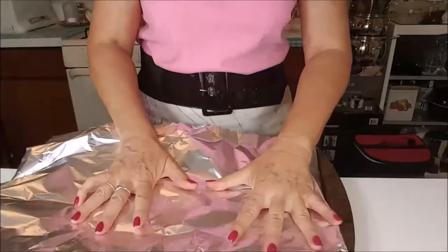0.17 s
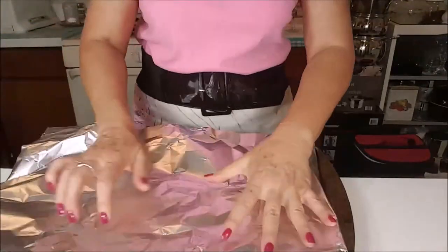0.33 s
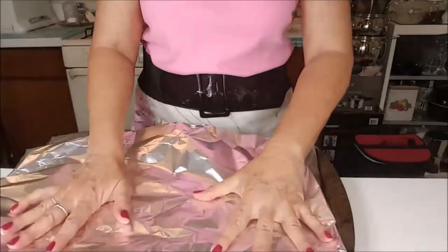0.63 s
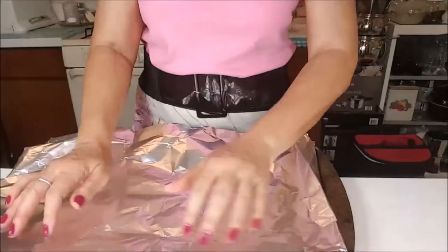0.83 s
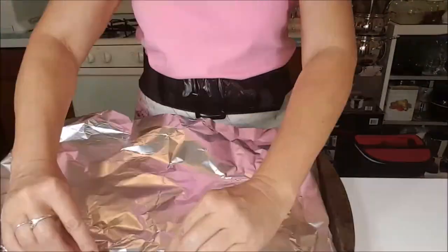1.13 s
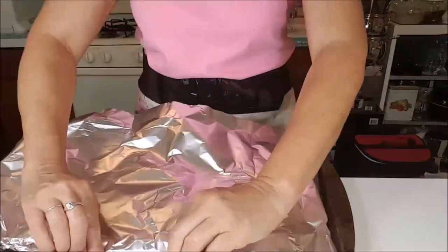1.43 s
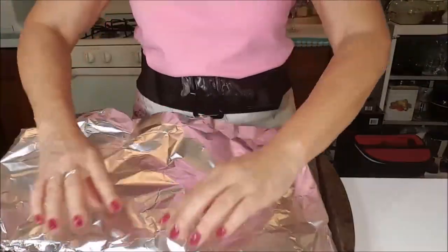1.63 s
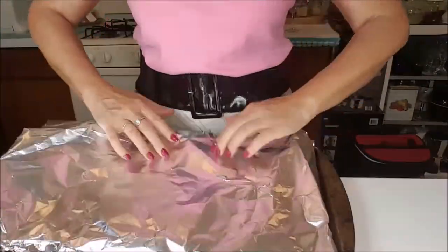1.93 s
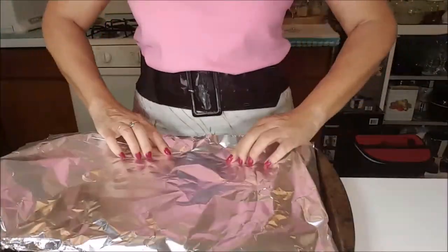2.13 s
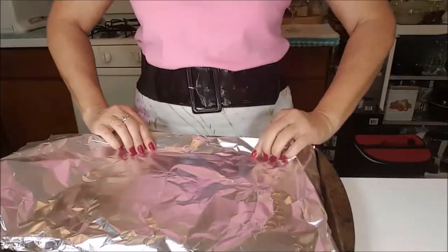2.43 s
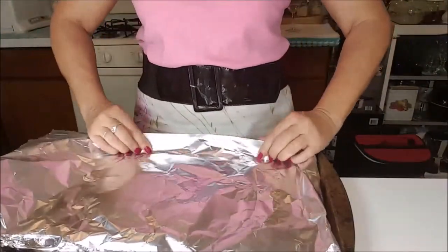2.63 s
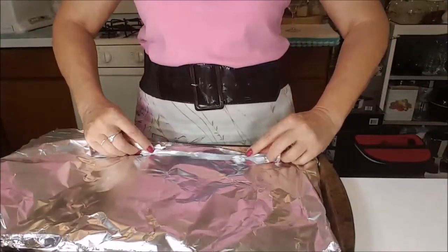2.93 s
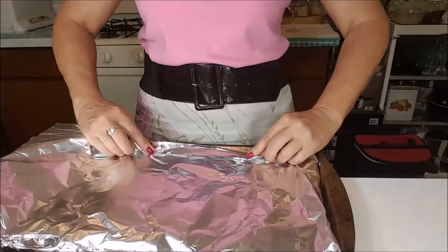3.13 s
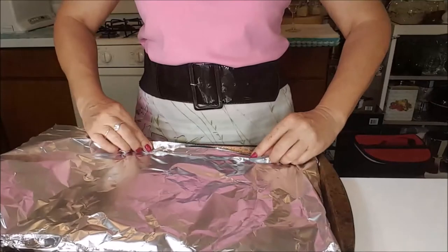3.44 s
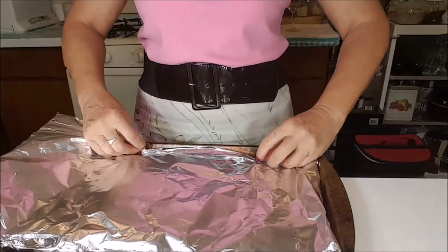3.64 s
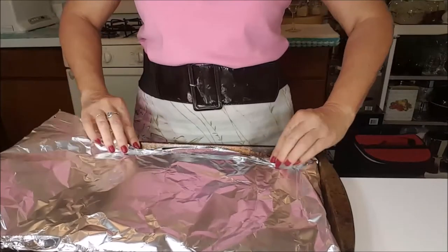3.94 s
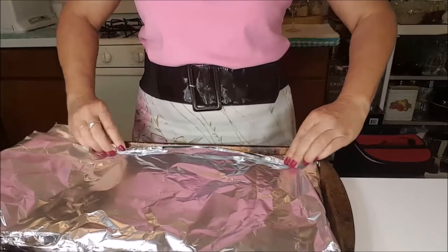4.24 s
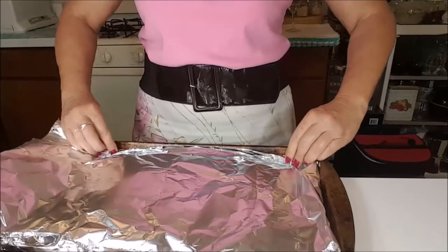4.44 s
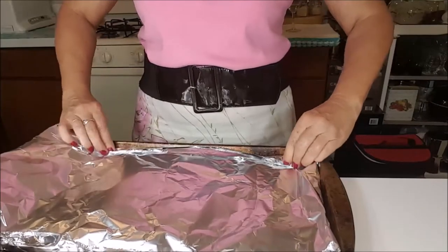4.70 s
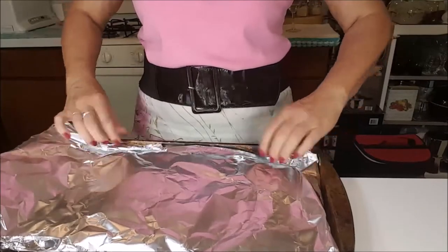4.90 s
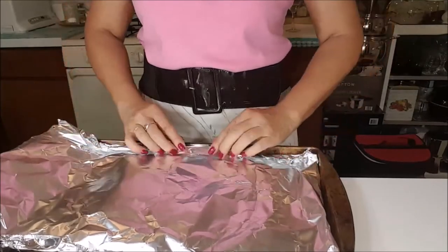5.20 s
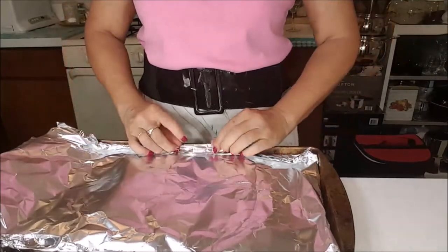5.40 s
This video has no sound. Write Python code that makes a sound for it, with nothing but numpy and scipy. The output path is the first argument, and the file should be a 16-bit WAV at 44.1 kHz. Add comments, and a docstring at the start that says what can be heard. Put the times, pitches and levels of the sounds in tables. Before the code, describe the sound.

Close stereo sound of aluminium foil being smoothed and crimped over a baking sheet in a small kitchen. From 0 to 0.5 s, loud, bright crackling made of countless tiny clicks, with sharp snaps. After a tiny dip, a strong crunch at about 0.6 s carries a ringing metallic knock from the sheet, followed by more rattling to 0.9 s. From 1.1 to 1.75 s the rustle is somewhat softer, with a crisp snap at 1.5 s. A short lull around 1.8-2.0 s exposes the low appliance hum. Vigorous crinkling returns at 2.1-2.7 s over a soft low table rumble, easing toward 3.3 s. From 3.4 to 4.8 s come lighter, irregular pinches and small snaps, with faint low pops near 4.4 s. A duller knock with clatter falls at 4.9 s, then a brief dip and final crisp bursts from 5.15 to 5.5 s. The room echo is short.

```python
"""Aluminium foil crinkles close to a two-channel microphone as two hands smooth and crimp it over a baking sheet.
Creases buckle in little avalanches of ringing noise clicks, denser than the ear can part; big ones snap.
Knocks on the sheet and low pops of a buckling panel are decaying sine modes, with a burst of noise for clatter.
A small kitchen answers with decaying noise, the table rumbles softly (low noise), and an appliance
hums in the room (steady sines over a rush of air)."""
import sys
import numpy as np
from scipy import signal
from scipy.fft import rfft, irfft, next_fast_len
from scipy.io import wavfile
from scipy.ndimage import uniform_filter1d

SR = 44100
rng = np.random.default_rng(int(sys.argv[2]) if len(sys.argv) > 2 else 0)


def master(y):
    """Save y as 16-bit WAV."""
    cut = np.clip(np.atleast_2d(y).T, -1, 1)
    pcm = np.round(cut * 32767)  # scale
    wavfile.write(sys.argv[1], SR, pcm.astype(np.int16))


N = 245328  # length in samples


def amp(db):
    """Decibels to gain."""
    return 10 ** (np.asarray(db) / 20)


def unit(x):
    """Scaled to rms 1."""
    return x / np.sqrt(np.mean(x ** 2) + 1e-20)


def along(points, hz):
    """(Hz, value) points read on a log frequency axis."""
    f, v = np.transpose(points)
    return np.interp(np.log(hz + 1), np.log(f + 1), v)


def over_time(points):
    """Gain at every sample from (seconds, dB) points."""
    return amp(np.interp(np.arange(N) / SR, *np.transpose(points)))


def filtered(x, response):
    """x through a response of frequency, applied to its spectrum."""
    m = next_fast_len(N + SR // 2)
    return irfft(rfft(x, m) * response(np.fft.rfftfreq(m, 1 / SR)), m)[..., :N]


def coloured(x, gain, size=4096):
    """x through the causal minimum-phase filter that has this gain of frequency."""
    cepstrum = irfft(np.log(np.maximum(gain(np.fft.rfftfreq(size, 1 / SR)), 1e-6)))
    # folding the cepstrum forward in time makes the filter causal
    cepstrum[1:size // 2] *= 2
    cepstrum[size // 2 + 1:] = 0
    impulse = irfft(np.exp(rfft(cepstrum)))
    return signal.fftconvolve(x, impulse[None], axes=1)[:, :N]


# Likeness of the two microphone ports. Each row: frequency in Hz, left-right correlation.
PORT_LIKENESS = [(60, 0.2), (200, 0.67), (640, 0.47), (1400, 0.55), (3100, 0.024), (6000, 0.013),
                 (15000, .01)]


def paired(x):
    """Two unrelated channels become alike towards the bass, as at two close microphone ports."""
    def turn(hz):
        return np.arccos(np.clip(along(PORT_LIKENESS, hz), -1, 1)) / 2
    mid, side = filtered(x, lambda hz: np.array([np.cos(turn(hz)), np.sin(turn(hz))]))
    return np.array([mid + side, mid - side])


# Dull flexing of the pressed sheet. Each row: frequency in Hz, relative level in dB per Hz.
FLEX_COLOUR = [(100, -16.5), (185, -6.5), (235, -4), (275, -1), (335, -9.5), (425, 3), (520, -14.5),
               (700, -9.5), (1000, -38.5)]
# Loose foil under flat hands sounds deeper than a tight fold at the rim.
# Each row: time in seconds, gain of the low rattle in dB.
SLACKNESS = [(0, 2), (0.8, 1.5), (1.6, 2.5), (2.1, -3.5), (2.8, 1), (3.6, 0.5), (4.4, 3), (4.9, -1),
             (5.5, -1)]


def foil(deep_hz=1850):
    """Crumpling under the hands, big snaps, and the dull flexing of the pressed sheet."""
    sizzle, rattle, pressure = handling()
    creases = crumple(rate=520, size_db=2.5, even_s=0.034)
    fine, broad = snaps(sizzle, rattle)
    treble = radiated(amp(0.58) * sizzle * creases + fine, True)
    body = radiated(amp(-3.0) * rattle * creases + broad, False)
    deep = filtered(body, lambda hz: 1 / (1 + (hz / deep_hz) ** 6))
    slack = over_time(SLACKNESS)
    flex = coloured(creases * pressure, lambda hz: unit(amp(along(FLEX_COLOUR, hz))))
    return paired(treble + body + (slack - 1) * deep + amp(-4.5) * flex)


# Hands lie on the foil and keep it rustling.
# Each row: start in seconds, end in seconds, effort in dB.
RESTING_HANDS = [(0, 0.458, -30), (0.579, 0.915, -32.5), (1.123, 1.757, -36.5), (1.991, 3.107, -30),
                 (3.09, 3.298, -36.5), (3.391, 4.94, -35), (5.131, 5.54, -35.5)]
# Fingers press or pinch: smoothing outwards, tucking the far edge, rolling the near edge, crimping the rim.
# Each row: start in seconds, hold in seconds, effort in dB, crispness of the spot in dB over the effort,
# weight on the sheet in dB over the effort.
FINGER_PRESSES = [ (0, 0.096, -26.5, 3, -16.5), (0.172, .075, -26.5, 2.5, -16), (0.272, 0.084, -28, 1, -13),
                  (0.613, 0.041, -23, 2, -13.5), (0.677, 0.052, -31, -0.5, -5),
                  (0.753, 0.15, -30.5, 0, -16), (1.14, 0.22, -32, -0.5, -16.5),
                  (1.431, 0.064, -30.5, -3, -9.5), (1.479, 0.081, -30, 0, -12),
                  (1.64, 0.057, -35, 0, -12.5), (1.857, .02, -46, -20, -20), (2.07, 0.072, -25.5, 1.5, -18),
                  (2.218, 0.064, -26.5, -2, -28), (2.347, 0.044, -29.5, -3, -11),
                  (2.391, 0.18, -26.5, -1, -18), (2.61, 0.12, -32, -4, -13.5), (2.794, 0.073, -35, 0.5, -9),
                  (2.924, 0.058, -32, 1.5, -11.5), (3.059, 0.034, -34, 1, -10.5),
                  (3.466, 0.023, -33, -12, -8), (3.545, 0.16, -35.5, 0, -10.5),
                  (3.819, .05, -30.5, 0.5, -16), (3.943, 0.088, -32, 0, -13),
                  (4.141, 0.15, -30.5, 0.5, -12.5), (4.293, 0.032, -29.5, 2, -20),
                  (4.406, 0.031, -34.5, 2.5, -22), (4.563, 0.21, -38, 0, -8), (4.742, 0.057, -32, 0, -14.5),
                  (4.861, 0.074, -30.5, -1, -14.5), (5.161, 0.084, -33.5, 0.5, -33),
                  (5.288, 0.051, -28.5, -1, -16), (5.372, 0.021, -28, 1.5, -20)]
GRIP_WEIGHT_DB = -20  # weight of resting hands on the sheet, over their effort
# sizzle gain at the usual effort, before the foil's mix; dB of sizzle gained per dB of crisp effort
USUAL_EFFORT_DB, SIZZLE_DB, SIZZLE_GROWS = -30, -29.5, 1.07
HISS_DB = -69.5  # faint steady hiss that remains between the hand movements, as an effort


def handling():
    """Gains of sizzle, rattle and pressure: panels rattle with the effort, fine creases sizzle ever more."""
    grips = [(start, end - start, db, 0, GRIP_WEIGHT_DB) for start, end, db in RESTING_HANDS]
    moves = grips + FINGER_PRESSES
    starts, holds, effort_db, crisp_db, weight_db = np.transpose(moves)[:, :, None]
    efforts = amp(effort_db) * push(starts, holds)
    # simultaneous moves add in power
    rattle, crisp, pressure = (np.linalg.norm(efforts * amp(db), axis=0) for db in (0, crisp_db, weight_db))
    crisp_over_hiss = np.hypot(crisp, amp(HISS_DB))
    sizzle = amp(SIZZLE_DB) * (crisp_over_hiss / amp(USUAL_EFFORT_DB)) ** SIZZLE_GROWS
    return sizzle, np.hypot(rattle, amp(HISS_DB)), pressure


# the foil gives way, yields a little less while held, then settles
ATTACK_S, SAG_DB_PER_S, SETTLE_DB_PER_S = 0.0021, 4.5, 208


def push(start, hold):
    """Gain of one push on the foil: a quick rise, a slow sag while it is held, then the foil settles."""
    t = np.maximum(np.arange(N) / SR - start, 0)
    rise = 1 - np.exp(-t / ATTACK_S)
    fall_db = SAG_DB_PER_S * t + SETTLE_DB_PER_S * np.maximum(t - hold, 0)
    return rise * amp(-fall_db)


def crumple(rate, size_db, even_s):
    """A ceaseless run of avalanches of unequal size (rate per second), evened to a steady mean strength."""
    total = int(rate * N / SR)
    starts = rng.uniform(0, N / SR, total)
    sizes = amp(size_db * rng.standard_normal(total))
    x = avalanches(starts, sizes, spread_s=.0025, scatter_db=0.0, ring_s=0.017, edge=3.04)
    # a faint hiss of foil sliding under the fingers fills the gaps
    x = unit(x) + amp(-11) * rng.standard_normal((2, N))
    width = max(int(even_s * SR), 2)
    power = uniform_filter1d(uniform_filter1d(np.mean(x ** 2, 0), width), width)
    return x / np.sqrt(np.abs(power) + 1e-9)


# Big creases giving way close to the microphone.
# Each row: time in seconds, relative sizzle in dB, relative rattle in dB.
BIG_SNAPS = [(.066, -18.5, -38), (.231, -18, -36), (0.348, -20.5, -33), (.444, -19.5, -31),
             (0.548, -33, -36.5), (0.576, -27, -36), (.641, -16, -24), (0.775, -17.5, -21.5),
             (1.105, -37, -40), (1.132, -29, -38), (1.161, -34, -25), (1.205, -30, -27), (1.303, -22, -31),
             (1.339, -21, -28), (1.498, -15, -24), (2.104, -17, -19.5), (2.411, -18, -34),
             (2.634, -21.5, -24), (2.813, -19, -20.5), (3.216, -23.5, -27), (3.329, -33, -39),
             (3.368, -32, -34), (3.388, -28, -32.5), (3.419, -29, -26.5), (3.522, -19, -31),
             (3.789, -20, -27), (4.122, -24, -27), (4.18, -22, -31), (4.332, -20, -33), (4.453, -25, -27.5),
             (4.488, -27, -28), (4.538, -31, -42), (4.626, -21, -27), (4.877, -22, -41), (5.135, -30, -37),
             (5.381, -20.5, -22), (5.554, -21.5, -23)]
# middling creases give way at random, all the louder the harder the hands work
STRAY_PER_S, STRAY_SCATTER_DB = 16, 3
STRAY_SIZZLE_DB, STRAY_RATTLE_DB = 24, 20  # their size over the crumpling gains of that moment


def snaps(sizzle, rattle):
    """Fine and broad clicks of the big creases, and of middling ones whose size follows the effort."""
    s, sizzle_db, rattle_db = np.transpose(BIG_SNAPS)
    chance = rng.random((int(STRAY_PER_S * N / SR), 3))
    at = (chance[:, 0] * N).astype(int)
    # sqrt(12) turns the uniform draw into one of standard deviation 1
    luck = amp(STRAY_SCATTER_DB * np.sqrt(12) * (chance[:, 1:].T - .5))
    starts = np.r_[s, at / SR]
    fine_sizes = np.r_[amp(sizzle_db + 22.5), amp(STRAY_SIZZLE_DB) * sizzle[at] * luck[0]]
    broad_sizes = np.r_[amp(rattle_db + 22), amp(STRAY_RATTLE_DB) * rattle[at] * luck[1]]
    fine = avalanches(starts, fine_sizes, spread_s=.0022, scatter_db=2.0, ring_s=0.021, edge=3.8, tint_db=0.5)
    broad = avalanches(starts, broad_sizes, spread_s=.0025, scatter_db=3, ring_s=0.018, edge=1.0, tint_db=0.1)
    return fine, broad


def avalanches(starts, sizes, spread_s, scatter_db, ring_s, edge, tint_db=2.5, count=7, channels=2, order=9):
    """Each buckle sets off a few clicks on one facet of the foil; each facet has its own short ring and colour."""
    total = len(starts)
    delays = spread_s * rng.exponential(size=(total, count))
    delays[:, 0] = 0
    clicks = amp(scatter_db * rng.standard_normal(delays.shape)) * rng.choice([-1, 1], delays.shape)
    clicks *= (sizes / np.linalg.norm(clicks, axis=1))[:, None]
    at = np.clip(((starts[:, None] + delays) * SR).astype(int), 0, N)

    t = np.arange(384) / SR
    rings = rng.standard_normal((total, channels, len(t))) * amp(-60 * t / ring_s)
    rings[:, :, 0] += edge  # the sharp front of a click
    hz = np.fft.rfftfreq(len(t), 1 / SR)
    # facets of different size and stiffness favour different bands
    bands = np.cos(np.pi * np.arange(1, order + 1)[:, None] * np.sqrt(hz / hz[-1]))
    tint = amp(tint_db * unit(rng.standard_normal((total, order)) @ bands))
    # the shift leaves room for the colouring to spread ahead of the front
    rings = irfft(rfft(np.roll(rings, 24, axis=2)) * tint[:, None])
    rings /= np.linalg.norm(rings, axis=2, keepdims=True)

    # facets lie all over the sheet, so each reaches the two ports at its own moments
    lag = rng.integers(12, size=(total, channels)) + [0, 3]
    out = []
    for c in range(channels):
        places = (at + lag[:, c, None])[:, :, None] + np.arange(len(t))
        sound = clicks[:, :, None] * rings[:, c, None]
        out.append(np.bincount(places.ravel(), sound.ravel(), N)[:N])
    return np.array(out)


# Colour of the foil. Each row: frequency in Hz, relative level in dB per Hz.
FOIL_COLOUR = [(120, -20.5), (200, -26), (278, 2.5), (347, 0), (424, -0.5), (558, -20), (968, -9),
               (1080, -6.5), (1560, -3.5), (1740, -6), (2560, -2), (6640, -6), (10700, 1.5), (12800, 0),
               (16000, -16)]


def radiated(x, fine, split_hz=5500):
    """Fine creases radiate the treble, broad panels the middle, and neither the bass."""
    def gain(hz):
        low = 1 / (1 + (hz / split_hz) ** 8)
        share = 1 - low if fine else low / (1 + (620 / (hz + 1)) ** 6)
        return unit(amp(along(FOIL_COLOUR, hz)) * np.sqrt(share))
    return coloured(x, gain)


# Resonances of the foil-covered sheet.
# Each row: frequency in Hz, width in Hz, strength in dB over the unresonant sound.
PANEL_RESONANCES = [(785, 18, 2), (1093, 28, 8), (1535, 90, 1), (1828, 55, -2), (2310, 90, -1),
                    (2525, 80, 0), (3640, 260, -5), (4762, 55, -3)]


def resonant(x):
    """The covered sheet lifts its own narrow bands and lets them ring on."""
    def gain(hz):
        lift = sum(amp(db) ** 2 / (1 + (2 * (hz - f) / w) ** 2) for f, w, db in PANEL_RESONANCES)
        return np.sqrt(1 + lift)
    return coloured(x, gain)


# Knocks on the baking sheet, and low pops of its panel or the foil buckling.
# Each row: time in seconds, relative level of the ring in dB, relative level of the foil's clatter in dB.
KNOCKS_AND_POPS = [(0.639, -19.5, -22), (0.778, -40, -40), (1.147, -37.5, -39), (1.5, -41, -28),
                   (2.289, -45, -30), (4.315, -48, -31), (4.383, -47, -30), (4.412, -45, -29),
                   (4.453, -44, -27), (4.923, -27.5, -20.5)]
# Modes of the sheet. Each row: frequency in Hz, middling level in dB, decay by 60 dB in seconds.
SHEET_MODES = [(155, -13, .12), (262, -4, .22), (283, 0, .33), (420, -7, .16), (786, -12, .2),
               (1095, -5, .2), (1380, -3, .13), (1530, -4, .13), (1840, -4, .13)]
# Colour of foil clattering on the sheet. Each row: frequency in Hz, relative level in dB per Hz.
CLATTER_COLOUR = [(150, 6), (400, -10), (600, -7.5), (950, -1), (1600, 7.5), (2100, -20), (4000, -32),
                  (10000, -47)]


def sheet(clatter_s=0.073):
    """Each knock or pop rings the sheet's modes at new strengths, with a burst of clatter from the foil."""
    t = np.arange(SR // 2) / SR
    out, clatter = np.zeros((2, N + SR)), np.zeros((2, N + SR))
    hz, level, t60 = np.transpose(SHEET_MODES)[:, :, None]
    for s, db, clatter_db in KNOCKS_AND_POPS:
        first = round(s * SR)
        span = slice(first, first + len(t))
        strength = amp(level + 0.94 * rng.standard_normal(hz.shape) - 60 * t / t60)
        ring = np.sum(strength * np.sin(2 * np.pi * (hz * t + rng.random(hz.shape))), 0)
        out[:, span] += amp(db - 7.5) * ring * (1 - np.exp(-t / 0.00081))
        clatter[:, span] += amp(clatter_db - 2.5 - 60 * t / clatter_s) * rng.standard_normal((2, len(t)))
    clatter = coloured(clatter[:, :N], lambda hz: unit(amp(along(CLATTER_COLOUR, hz))))
    return out[:, :N] + paired(clatter)


# Fingers pushing the sheet's rim against the table. Each row: time in seconds, rumble in dB.
RIM_PUSHES = [(0, -71), (1.9, -60), (2.1, -52.5), (2.6, -51), (3.1, -50.5), (3.4, -52.5), (3.8, -61),
              (4.3, -59), (4.9, -56), (5.1, -66), (5.56, -59)]


def table(centre_hz=185, width_hz=70):
    """The table top rumbles softly, a narrow band of low noise, as fingers push the rim against it."""
    def band(hz):
        return 1 / (1 + (2 * (hz - centre_hz) / width_hz) ** 4)
    rumble = unit(paired(filtered(rng.standard_normal((2, N)), band)))
    return rumble * over_time(RIM_PUSHES)


# Reverberation of the small kitchen. Each row: frequency in Hz, decay by 60 dB in seconds.
KITCHEN_DECAY = [(200, 0.19), (1500, 0.2), (5000, 0.17), (15000, 0.024)]


def kitchen(x, gap_s=.005, size=512):
    """The room's diffuse answer: each band stores the energy it receives and lets it die at its own speed."""
    grid = dict(fs=SR, nperseg=size, noverlap=size - size // 4)
    hz, t, z = signal.stft(x, **grid)
    decay = amp(-60 * t[t < .5] / along(KITCHEN_DECAY, hz)[:, None]) ** 2
    decay /= decay.sum(1, keepdims=True)
    received = np.mean(np.abs(z) ** 2, 0)
    stored = signal.fftconvolve(received, decay, axes=1)[:, :len(t)]
    # every click comes from a new spot, so its echoes arrive in a new order
    echoes = signal.stft(rng.standard_normal((2, N)), **grid)[2]
    tail = signal.istft(echoes / np.std(echoes) * np.sqrt(np.abs(stored)), **grid)[1]
    return paired(np.pad(tail, ((0, 0), (int(gap_s * SR), 0)))[:, :N])


# Hum of the appliance in the room. Each row: frequency in Hz, level in dB rms ahead of the microphone.
APPLIANCE_HUM = [(37, -61), (59.2, -47), (74.2, -51.5), (118.4, -51), (120, -54.5), (157, -58), (236, -60)]
# Colour of its air. Each row: frequency in Hz, relative level in dB per Hz.
AIR_COLOUR = [(20, -19), (60, -0.5), (140, 3.5), (220, -7.5), (400, -19), (1000, -20.5), (4000, -106),
              (16000, -61.5)]


def appliance():
    """Motor and mains hum, steady sines, over a soft rush of air, coloured noise."""
    t = np.arange(N) / SR
    hum = np.zeros(N)
    for hz, db in APPLIANCE_HUM:
        hum += np.sqrt(2) * amp(db) * np.sin(2 * np.pi * (hz * t + rng.random()))
    air = paired(filtered(rng.standard_normal((2, N)), lambda hz: amp(along(AIR_COLOUR, hz))))
    return hum + amp(-50.5) * unit(air)


# Balance of the two microphone channels. Each row: frequency in Hz, left minus right in dB.
LEFT_LEAN = [(60, 2.5), (110, 4.5), (300, 1.5), (1300, 1), (4400, 0), (8100, 0), (11000, -3.5), (15000, 4)]


def scene():
    """Foil, sheet and table in the room, with the hum behind them."""
    crinkle, knocks = foil(), sheet()
    # the crinkle and its echo both carry the sheet's resonances
    crinkle = resonant(crinkle + amp(-2.5) * kitchen(crinkle))
    mix = crinkle + knocks + amp(-8.5) * kitchen(knocks) + table() + appliance()
    return filtered(mix, lambda hz: amp(np.outer([.5, -.5], along(LEFT_LEAN, hz))))


TOP_HZ = 16100  # upper limit of the microphone's band


def record(dry):
    """The microphone channel falls off steeply above its band limit."""
    return filtered(dry, lambda hz: 1 / np.sqrt(1 + np.minimum(hz / TOP_HZ, 2) ** 240))


dry = scene()
out = record(dry)
master(out)
```